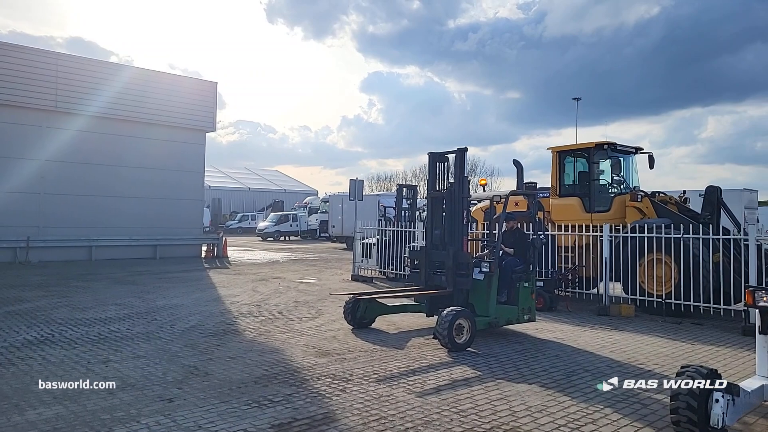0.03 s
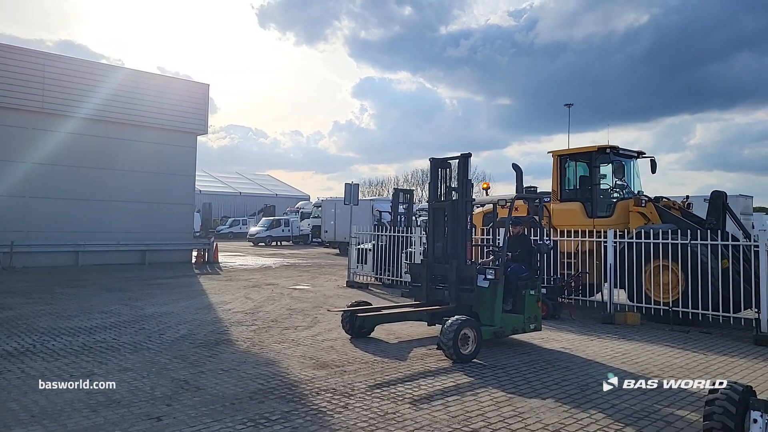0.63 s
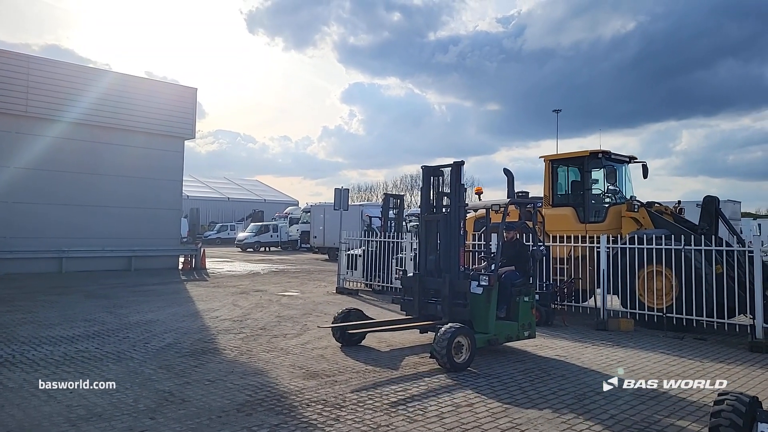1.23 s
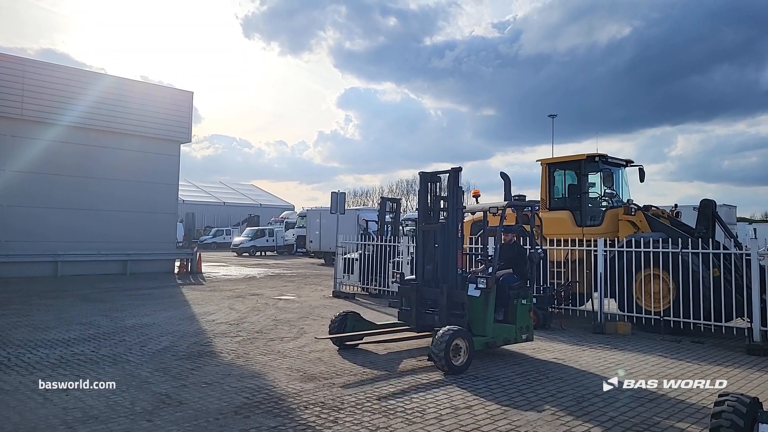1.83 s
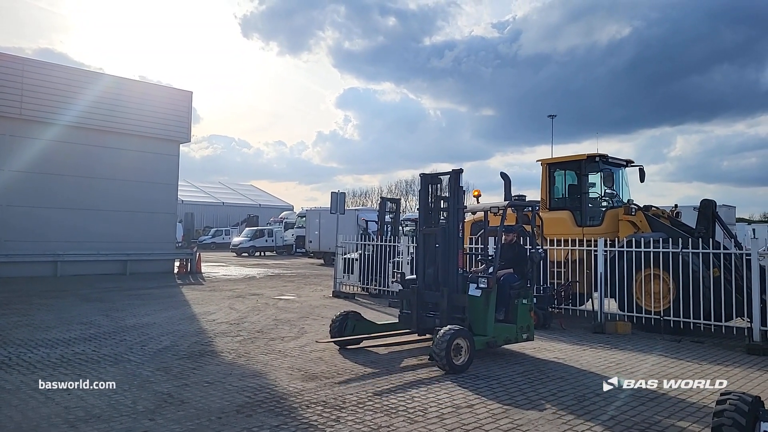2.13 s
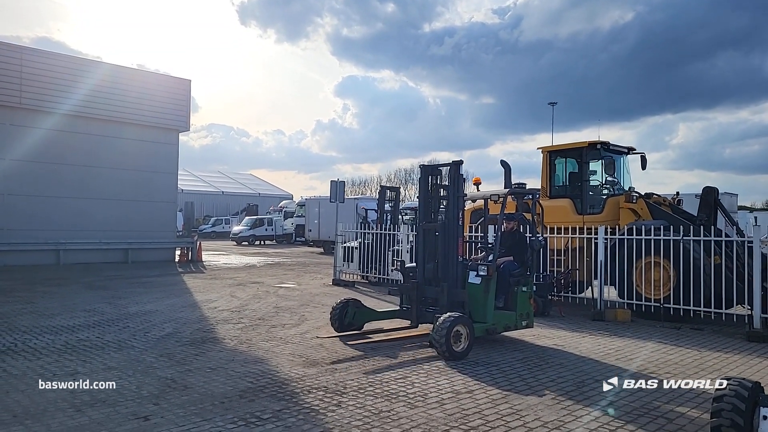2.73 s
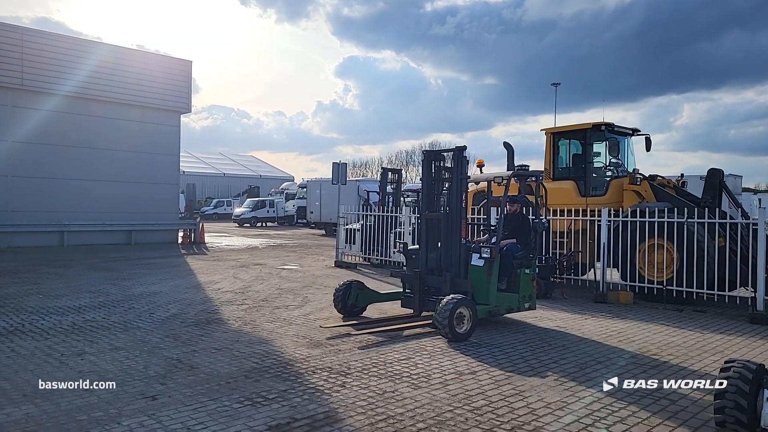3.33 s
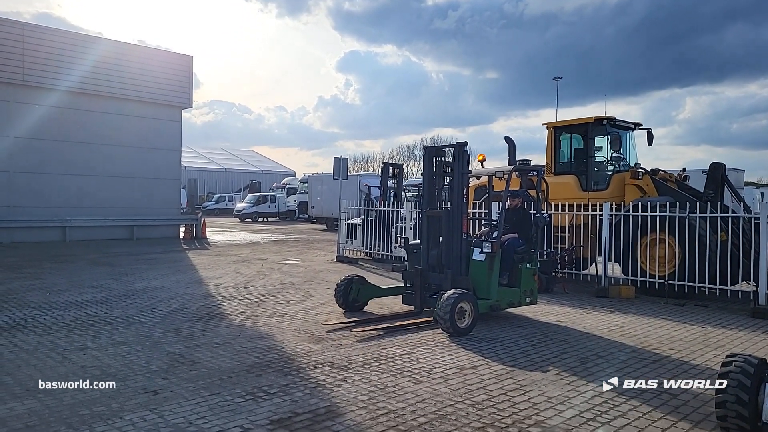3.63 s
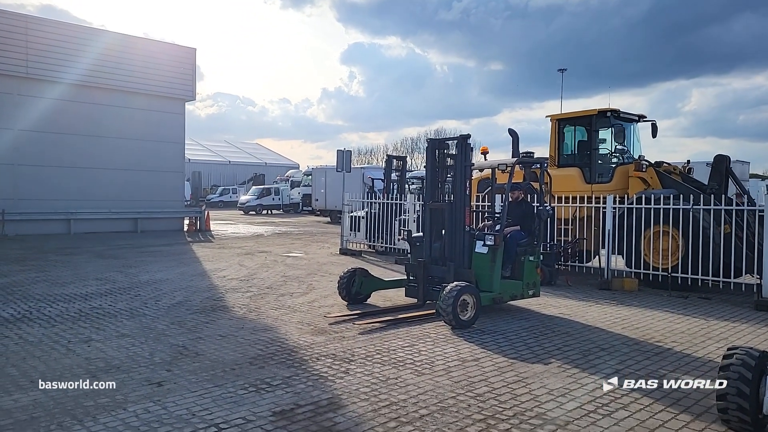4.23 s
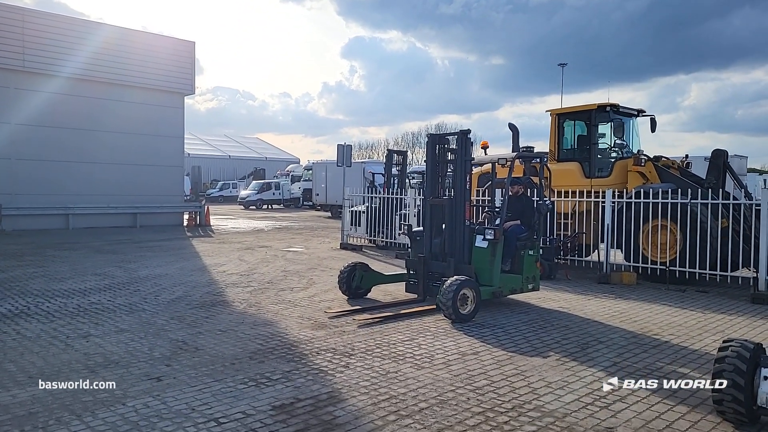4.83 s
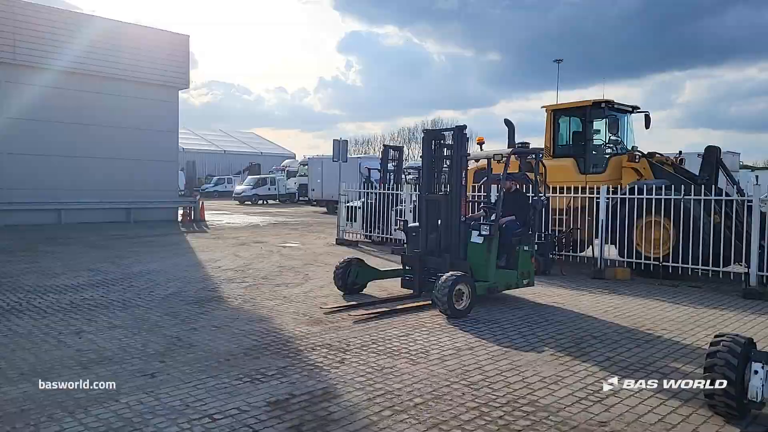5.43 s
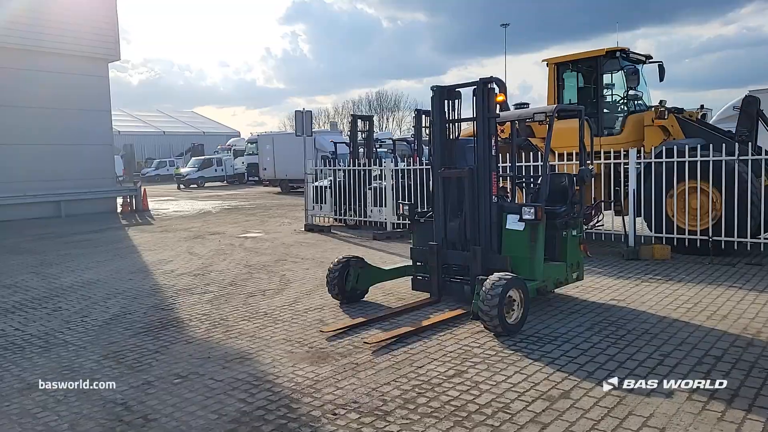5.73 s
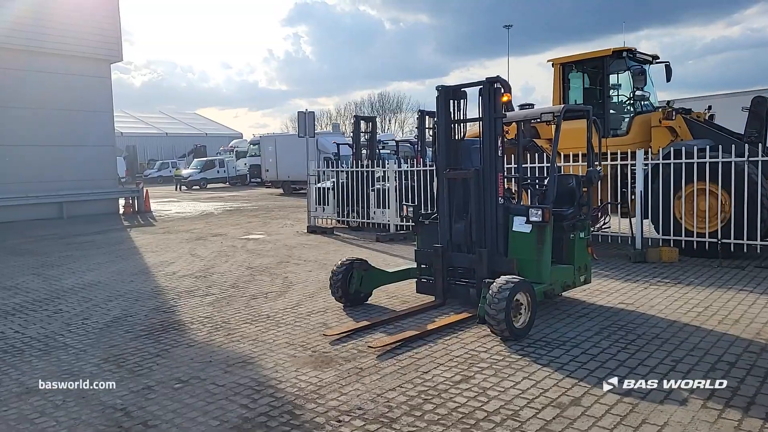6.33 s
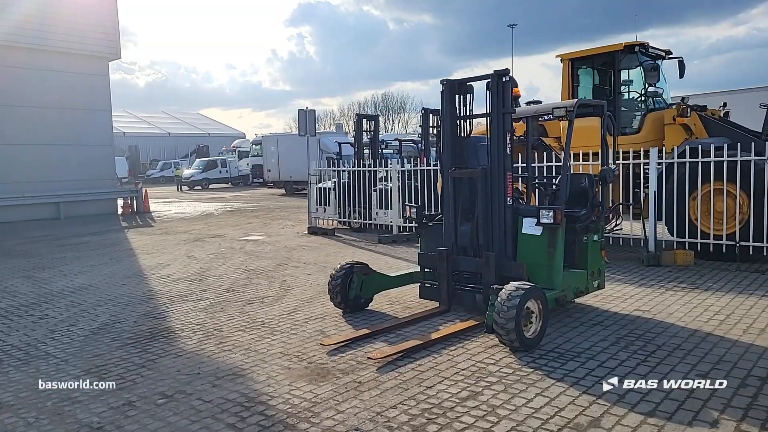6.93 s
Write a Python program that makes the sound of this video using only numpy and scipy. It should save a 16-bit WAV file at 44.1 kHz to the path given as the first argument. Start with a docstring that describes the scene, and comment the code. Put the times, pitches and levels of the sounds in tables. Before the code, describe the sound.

A diesel forklift drones under hydraulic load, eases off, clangs its forks on paving, then idles closer beside another ticking diesel.

```python
"""First comes the hard drone of a three-cylinder diesel forklift, its hydraulic pump loading the engine.
Each firing thumps in the exhaust and knocks the engine block, while oil hisses through a valve.
The pump lets go, then loads the engine again as the forks clang down on the paved yard.
After a tiny silence the forklift is closer and idles slowly. A second diesel throbs and ticks
nearby in both stretches, over a low rumble."""
import sys
import numpy as np
from scipy import signal
from scipy.fft import rfft, irfft, next_fast_len
from scipy.io import wavfile
from scipy.ndimage import uniform_filter1d

SR = 44100
rng = np.random.default_rng(int(sys.argv[2]) if len(sys.argv) > 2 else 0)


def bounce(signal):
    """Save signal as a 16-bit WAV file at the path given by the first command-line argument."""
    frames = np.transpose(np.atleast_2d(signal))
    limited = np.clip(frames, -1, 1)
    pcm = np.round(limited * 32767).astype(np.int16)
    wavfile.write(sys.argv[1], SR, pcm)


N = 317079
T = np.arange(N) / SR
HZ = np.fft.rfftfreq(N, 1 / SR)
SILENCE_FROM_S, SILENCE_TO_S = 5.402, 5.449


# How hard each of the three cylinders fires: (level [dB])
CYLINDER_DB = [0, -3, -0.74]
# Tone of the knocking engine block: (pitch [Hz], level [dB])
BLOCK_TONE = [(50, -20), (90, -3), (180, -4), (255, 3), (340, -11), (450, -7), (520, -11), (620, -7),
              (720, -16), (1100, -19), (2500, -32)]
def forklift_working(free_firing_hz=61.595, slowdown_hz=3.033):
    """The pump slows the engine and makes it work harder; each stroke also jolts the body."""
    effort, age = pump(), stroke_age()
    flow = lagged(effort, lag_s=0.09, first=1)
    load = np.clip(0.087 + flow, 0, 1)  # a little load stays with the valve shut
    shake = amp(0.82 + 3 * surge(age, peak_s=0.16))
    firings = np.cumsum(free_firing_hz - slowdown_hz * effort) / SR  # counts up by one per firing
    firings = firings - np.interp(.4773, T, firings)  # the first cylinder fires at .4773 s
    firings += 0.0011 * wander(hz=40.2)
    note = working_exhaust(firings, load)
    puffs = shake * gas_puffs(firings, load, age)
    rattle = np.sqrt(shake) * clatter(firings) + panel_buzz()
    oil = oil_hiss(age)
    knock = shake ** 2 * amp(-39) * block_knock(firings, BLOCK_TONE, scatter_db=1.6)
    return note + puffs + rattle + knock + flow * (hollow_boom(note, firings, age) + oil)


# Spells of pumping: (valve opens [s], valve shuts [s], effort [1 = full load])
PUMP_STROKES = [(0.0, 3.605, 1.0), (4.621, 4.749, 1.258)]
def pump(open_s=.104, shut_s=.122, ease_per_s=.017):
    """The pump's effort rises as the valve opens, eases a little, and falls as it shuts."""
    total = np.zeros(N)
    for start, end, effort in PUMP_STROKES:
        opening = np.clip((T - start) / open_s, 0, 1)
        shutting = np.clip(1 - (T - end) / shut_s, 0, 1)
        total += effort * opening * shutting * (1 - ease_per_s * (T - start))
    return total


def stroke_age():
    """Seconds since the latest pump stroke began."""
    starts = np.array(PUMP_STROKES)[:, 0]
    return T - starts[np.searchsorted(starts, T, side="right") - 1]


# Exhaust notes, working hard and running free: (pitch [times the firing rate], level [dB])
LOADED_NOTES = [(1, -2.8), (2, 0.0), (3, -3.8), (4, -11.9), (5, -25.8), (6, -19.2), (7, -20.4), (8, -14.0),
                (9, -23.7), (10, -21.8), (11, -22.0), (12, -42.1), (13, -46.1), (14, -39.5), (15, -46.4),
                (16, -32.6), (17, -43.8), (18, -37.9), (19, -39.0), (20, -40.8)]
FREE_NOTES = [(1, -9), (2, 2), (3, -4.5), (4, -27.5), (5, -33), (6, -34.5), (7, -25), (8, -30), (9, -39),
              (10, -26.5)]
# Extra notes from unequal cylinders, likewise: (pitch [times the cycle rate], level [dB])
LOADED_UNEVEN = [(4, 0), (5, 4.5), (7, -5), (14, 11), (16, -1), (20, -5.5), (22, -25), (23, 1), (25, -12.5),
                 (31, -0.8)]
FREE_UNEVEN = [(5, -1), (14, 0), (22, 4)]
# Rise and fall of both engines' low throb: (time [s], level [dB])
THROB_LEVEL = [(0, -1.5), (1.5, 0), (5.4, 0), (5.45, -6), (5.76, -.5), (7.19, 0)]
def working_exhaust(firings, load):
    """The drone blends from a smooth hum to a harder note as the load grows."""
    loaded = amp(-12.9) * exhaust(firings, LOADED_NOTES, hardness=load)
    loaded += amp(-31.5) * uneven_cylinders(firings, LOADED_UNEVEN)
    free = amp(-16.5) * exhaust(firings, FREE_NOTES)
    free += amp(-38.5) * uneven_cylinders(firings, FREE_UNEVEN)
    return (load * loaded + (1 - load) * free) * amp(curve(THROB_LEVEL) + .5 * wander(hz=49.43))


def exhaust(firings, notes, hardness=0.93, size=256):
    """Each firing sends a pulse ringing through the silencer; a softer pulse has weaker high notes."""
    multiple, db = np.transpose(notes)
    grid = np.arange(size) / 4  # four steps from one note to the next
    shape_db = np.interp(grid[:size // 2 + 1], np.r_[0, multiple, multiple[-1] + 4],
                         np.r_[db[0] - 12, db, db[-1] - 10])
    mirrored = amp(np.r_[shape_db, shape_db[-2:0:-1]])
    phase = -signal.hilbert(np.log(mirrored)).imag  # the ringing comes after the pulse
    phase += rng.uniform(-2, 2, size) * (grid > 5)  # echoes scatter the high notes in time
    phase -= .08 * (grid - 2) ** 2  # the silencer holds higher notes back longer
    softening = hardness ** 0.1
    wave = sum(amp(level) * softening ** (k - 1) * np.cos(2 * np.pi * k * firings + phase[4 * k])
               for k, level in zip(np.rint(multiple).astype(int), db))
    return -np.sqrt(2) * wave / np.linalg.norm(amp(db))


def uneven_cylinders(firings, notes):
    """Unequal cylinders repeat every three firings (one cycle), adding notes between the main ones."""
    cycles = firings / len(CYLINDER_DB)
    return unit(sum(amp(db + 4.3 * wander(hz=6)) * np.cos(2 * np.pi * (round(k) * cycles + rng.random()))
                    for k, db in notes))


def block_knock(firings, tone, scatter_db=2.0, ring_s=0.11):
    """Each firing knocks the engine block and its panels, never twice equally hard."""
    hits = np.flatnonzero(np.diff(np.floor(firings)) > 0)
    cylinder = np.floor(firings[hits + 1]).astype(int) % len(CYLINDER_DB)
    blows = np.zeros(N)
    blows[hits] = amp(np.array(CYLINDER_DB)[cylinder] + scatter_db * rng.standard_normal(len(hits)))
    ring = noise(tone, size=8192) * amp(-60 * T[:8192] / ring_s)
    return unit(signal.oaconvolve(blows[None], ring, axes=1)[:, :N])


# Tone of the boom, with two hollow peaks: (pitch [Hz], level [dB])
BOOM_TONE = [(150, -36), (205, 0), (238, 4.5), (275, -25), (330, -25), (520, -27), (590, -2), (650, -0.5),
             (720, -13), (820, -32)]
def hollow_boom(note, firings, age, rise_s=.25, fade_db_per_s=11.5, roughness=0.44):
    """The exhaust note and its puffs set off a hollow ringing early in each stroke."""
    hum = unit(irfft(rfft(note) * amp(read(BOOM_TONE, HZ)), N))
    puffs = unit(noise(BOOM_TONE) * bursts(firings, CYLINDER_DB, length=1.2))
    swell = amp(-21 - fade_db_per_s * age) * (1 - np.exp(-age / rise_s))
    return swell * unit((1 - roughness) * hum + roughness * puffs)


# Tone of the puffing gas: (pitch [Hz], level [dB])
PUFF_TONE = [(150, -28), (280, -4), (450, -5.5), (630, 8), (760, -16), (1200, -20), (3000, -26)]
def gas_puffs(firings, load, age):
    """Each firing puffs out gas, louder under load and fading as the stroke goes on."""
    level = amp(-35 - 0.8 * age * load) * (.5 + .5 * load)
    return level * noise(PUFF_TONE, ripple_db=3.5) * bursts(firings, CYLINDER_DB, length=1.0)


# Tone of the working engine's clatter: (pitch [Hz], level [dB])
CLATTER_TONE = [(200, -30), (400, 1), (750, 3.5), (1080, 2), (1500, -3.5), (2000, -3), (2600, -6.5),
                (3300, -10.5), (6200, -13.5), (7900, -11), (8900, -22), (11700, -26.5), (13300, -28),
                (17000, -19)]
def clatter(firings):
    """A bright rattle that pulses gently with the firings."""
    pulsing = unit(1 + 0.19 * bursts(firings, CYLINDER_DB, length=0.83))
    return amp(-36.5) * noise(CLATTER_TONE, ripple_db=2.5) * pulsing * amp(0.36 * wander(hz=24.9))


# Tone of a buzzing panel: (pitch [Hz], level [dB])
PANEL_TONE = [(2200, -26), (2480, 1), (2570, 0), (2700, -8.5), (2950, -8)]
def panel_buzz():
    """A panel gives a faint, flickering buzz."""
    return amp(-54) * noise(PANEL_TONE) * amp(3.3 * wander(hz=25.04))


# Tone of the rushing oil: (pitch [Hz], level [dB])
OIL_TONE = [(1500, -10), (3300, 4), (5300, 6.5), (6500, -6), (7700, 13), (8800, -2), (11700, -18),
            (13300, 5), (16000, -28)]
def oil_hiss(age):
    """Oil rushes through the valve, loudest as a stroke gets going."""
    return amp(-51.5 + 6 * surge(age, peak_s=0.49)) * noise(OIL_TONE)


# Exhaust notes at idle: (pitch [times the firing rate], level [dB])
IDLE_NOTES = [(1, -35.5), (2, -3.5), (3, 1.5), (4, -6), (5, -8), (6, -11), (7, -16.5), (8, -11), (9, -22),
              (10, -29.5)]
# Tones of the clatter and the block from close by: (pitch [Hz], level [dB])
CLOSE_CLATTER_TONE = [(200, -32), (400, -6.5), (720, 8.5), (950, 1), (1450, -4.5), (1950, -2.5), (2650, -6),
                      (3200, -9.5), (4500, -8.5), (6200, -13.5), (7900, -10.5), (8900, -23), (11700, -24.5),
                      (17000, -20)]
CLOSE_BLOCK_TONE = [(50, -20), (90, -3), (180, -6), (270, 4), (340, -9), (460, -15), (620, -5),
                    (720, -18.5), (1100, -20), (2500, -32)]
def forklift_idling(firing_hz=32.15, settle_db=3.0, settle_s=0.33):
    """Slow, soft firings let the clatter stand out; the body shakes more at first, then settles."""
    firings = (T - 5.5915) * firing_hz + 0.0048 * wander(hz=20)
    shake = amp(settle_db * np.exp(-np.maximum(T - SILENCE_TO_S, 0) / settle_s))
    note = amp(-21.5 + curve(THROB_LEVEL) + 1.9 * wander(hz=29.8)) * exhaust(firings, IDLE_NOTES)
    pulsing = unit(1 + 0.086 * bursts(firings, CYLINDER_DB, length=1.0))
    rattle = amp(-37.5) * noise(CLOSE_CLATTER_TONE, ripple_db=2.0) * pulsing
    knock = amp(-36.5) * block_knock(firings, CLOSE_BLOCK_TONE)
    return note + shake * (knock + rattle)


# Blows on the forks and mast: (time [s], level [dB], ring length [1 = full])
FORK_HITS = [(.29, -29, .7), (.338, -32, .7), (4.737, -18, 0.89), (4.744, -15.5, 0.75),
             (4.757, -21.5, 0.84), (4.8, -27.5, 1), (4.864, -30, .9)]
# Ringing notes of the steel forks: (pitch [Hz], level [dB], time to fade by 60 dB [s])
STEEL_NOTES = [(457, -6, 0.41), (586, 2, 0.19), (660, -9, 0.2), (990, 1, 0.12), (1116, -8, 0.25),
               (1340, -4, 0.19), (1503, -8, .28), (1962, -6, 0.13), (2360, -19, .2), (2530, -7.5, 0.27),
               (2960, -30, .18), (3440, -13, 0.19)]
# Tone of the crashing chain and mast: (pitch [Hz], level [dB])
CRASH_TONE = [(120, -15), (300, 6.5), (620, 7), (800, -4), (1250, -1), (1700, -8), (2700, -10),
              (3700, -14.5), (6000, -24), (12000, -43)]
def forks(crash_s=0.093, ring_db=-5.5, rise_s=0.0035):
    """The forks land and rattle: a short crash of chain and mast, and ringing steel."""
    out, t = np.zeros((2, N)), T[:SR]
    for start, db, length in FORK_HITS:
        phases = rng.uniform(0, 2 * np.pi, (len(STEEL_NOTES), 2, 1))
        ring = sum(amp(level - 60 * t / (fade_s * length)) * np.sin(2 * np.pi * hz * t + phase)
                   for (hz, level, fade_s), phase in zip(STEEL_NOTES, phases))
        crash = noise(CRASH_TONE, size=SR) * amp(-60 * t / (crash_s * length))
        add(out, start, amp(db) * (crash + amp(ring_db) * ring) * (1 - np.exp(-t / rise_s)))
    return out


# Second diesel's exhaust before and after the silence: (pitch [times the firing rate], level [dB])
SECOND_NOTES_BEFORE = [(1, -17), (2, -9.5), (3, 0.5), (4, -0.5)]
SECOND_NOTES_AFTER = [(1, -14.5), (2, 0.5), (3, 1.5), (4, 0), (5, -12.5), (6, -23), (7, -22), (8, -13.5)]
# Tones of its knock and its ticks: (pitch [Hz], level [dB])
KNOCK_TONE = [(1000, -23), (1600, -17), (1900, 7), (2250, -14), (2620, 3), (3200, -13), (4500, -18),
              (7000, -11)]
TICK_TONE = [(1000, -14), (2000, 15), (4000, 0.5), (7800, 9.5), (9000, -1.5), (11700, -6), (13300, 0.5),
             (16000, -2)]
# How loudly each of its fuel injectors ticks: (level [dB])
INJECTOR_DB = [0, -1.0, -8.0]
def second_diesel(notes, firing_hz, fires_at_s, note_db, tick_db, knock_db):
    """Another engine idles: its exhaust throbs, its firings knock, its injectors tick with a limp."""
    firings = (T - fires_at_s) * firing_hz
    note = amp(note_db + curve(THROB_LEVEL)) * exhaust(firings + 0.011 * wander(hz=20), notes)
    knock = noise(KNOCK_TONE) * bursts(firings - .1, [0, -2.5, -1.5], length=0.32)
    knock *= amp(knock_db + 1.4 * wander(hz=36.6))
    ticks = noise(TICK_TONE) * bursts(firings - .5, INJECTOR_DB, length=.2, rise=.1)
    ticks *= amp(tick_db + wander(hz=35))
    return note + knock + ticks


# Light metal clicks: (time [s], level [dB])
CLICK_HITS = [(.968, -42), (4.324, -47), (6.56, -35), (6.57, -40), (6.682, -45)]
# Tone of a click: (pitch [Hz], level [dB])
CLICK_TONE = [(800, -14), (1800, 3), (3600, -4), (4400, 13), (5400, -5), (7300, 6), (9000, -3), (12000, -8),
              (16000, -8)]
def clicks(fade_s=0.11):
    """Small, dry metal clicks that die away at once."""
    out, t = np.zeros((2, N)), T[:SR // 10]
    for start, db in CLICK_HITS:
        add(out, start, amp(db - 60 * t / fade_s) * noise(CLICK_TONE, size=len(t)))
    return out


# Tones of the steady rumble and its swells: (pitch [Hz], level [dB])
RUMBLE_TONE = [(15, -30), (28, -43), (45, 1), (110, -7), (170, -8), (265, -4), (320, -14), (600, -17.5),
               (900, -41)]
SWELL_TONE = [(20, -14), (45, -1), (62, 6), (100, -1), (180, -11), (350, -20.5), (900, -29)]
# Swells of rumble: (time [s], peak level [dB], half length [s])
SWELLS = [(7.022, -15, .05), (7.18, -23, .04)]
def yard_rumble():
    """A steady low rumble, with two brief swells near the end."""
    swells = sum(amp(db) * np.exp(-((T - peak_s) / half_s) ** 2) for peak_s, db, half_s in SWELLS)
    return amp(-29) * noise(RUMBLE_TONE) + swells * noise(SWELL_TONE)


# How alike left and right sound: (pitch [Hz], likeness [0-1])
SIDE_LIKENESS = [(60, .99), (150, .98), (300, .92), (650, .8), (1400, .35), (3000, .35), (6500, .35),
                 (8000, .78), (15000, .84)]
# How far the left side runs ahead: (pitch [Hz], lead [radians])
LEFT_LEAD = [(0, 0), (600, -.2), (1150, -1.5), (1450, -3.2), (2150, -6.2), (2600, -6.8), (4200, -11.6),
             (5200, -15.5), (6100, -16), (7000, -12.6), (16000, -12.6)]
def noise(tone, size=N, ripple_db=0.):
    """Stereo noise of a given tone: alike on both sides in the bass, scattered by the yard higher up."""
    count = next_fast_len(size, True)
    hz = np.fft.rfftfreq(count, 1 / SR)
    shared, separate = rfft(rng.standard_normal((2, count)))
    like, lead = np.clip(read(SIDE_LIKENESS, hz), 0, 1), read(LEFT_LEAD, hz)
    right = (like * shared + np.sqrt(1 - like ** 2) * separate) * np.exp(-1j * lead)
    db = read(tone, hz) - 20 * np.log2(np.maximum(hz / tone[-1][0], 1))  # fades above the last row
    db += ripple_db * read(np.c_[np.geomspace(300, 16000, 300), rng.standard_normal(300)], hz)
    middle_gain = np.sqrt(1 + like * np.cos(lead) + 1e-3)
    sides = irfft(np.array([shared, right]) * amp(db) / middle_gain, count)[:, :size]
    return sides / np.std(sides.mean(0))


def bursts(firings, cylinder_db, length, rise=0.089):
    """A level that jumps at each firing, then fades; length and rise are counted in firings."""
    age = firings % 1
    cylinder = np.floor(firings).astype(int) % len(cylinder_db)
    return unit(amp(cylinder_db)[cylinder] * (1 - np.exp(-age / rise)) * np.exp(-age / length))


def surge(age, peak_s):
    """Rises to 1 at peak_s and dies away."""
    return age / peak_s * np.exp(1 - age / peak_s)


def lagged(x, lag_s, first):
    """Follows x sluggishly, starting from the value first."""
    keep = np.exp(-1 / (lag_s * SR))
    return first + signal.lfilter([1 - keep], [1, -keep], x - first)


def wander(hz):
    """A random drift that heads for a new value hz times a second."""
    count = int(8 * hz) + 2
    return unit(np.interp(T * hz, np.arange(count), rng.standard_normal(count)))


def amp(db):
    """Turns decibels into a gain."""
    return 10 ** (np.asarray(db) / 20)


def unit(x):
    """Scales to an average strength (rms) of 1."""
    return x / np.sqrt(np.mean(x ** 2) + 1e-20)


def curve(rows):
    """Joins (time, value) rows with straight lines."""
    return np.interp(T, *np.transpose(rows))


def read(rows, hz):
    """Looks up hz between (pitch, value) rows, with octaves evenly spaced."""
    pitch, value = np.transpose(rows)
    return np.interp(np.log(hz + 1), np.log(pitch + 1), value)


def add(mix, start_s, sound):
    """Mixes in a stereo sound at start_s."""
    part = mix[:, round(start_s * SR):][:, :sound.shape[1]]
    part += sound[:, :part.shape[1]]


def scene():
    """Two stretches in the same yard, with a moment of silence between them."""
    far = forklift_working() + second_diesel(
        SECOND_NOTES_BEFORE, firing_hz=34.07, fires_at_s=3.7523,
        note_db=-24.5, tick_db=-51.5, knock_db=-52.5)
    near = forklift_idling() + second_diesel(
        SECOND_NOTES_AFTER, firing_hz=34.11, fires_at_s=5.5816,
        note_db=-19.5, tick_db=-49.5, knock_db=-45.5)
    yard = yard_rumble() + forks() + clicks()
    before, after = uniform_filter1d(np.array([T < SILENCE_FROM_S, T > SILENCE_TO_S], float), size=100)
    return before * (far + yard) + after * (near + yard)


# How much louder the left side is: (pitch [Hz], left minus right [dB])
LEFT_BOOST = [(30, 2.5), (60, 1.9), (125, 1.4), (250, .7), (500, 1.7), (1000, 0), (2000, -1.8),
              (4000, -3.4), (8000, -2.7), (12000, -3.6)]
# How far the left side falls behind: (pitch [Hz], lag [radians])
LEFT_LAG = [(30, 1), (60, 0.22), (125, 0.2), (250, 0.22), (500, 0.46), (900, 0.18)]
def record(dry, top_hz=15900):
    """Each side gets its own tone, low notes reach the left later, and the highest treble is cut."""
    difference = np.log(amp(read(LEFT_BOOST, HZ))) - 1j * read(LEFT_LAG, HZ)
    coloured = irfft(rfft(dry) * np.exp(np.array([[.5], [-.5]]) * difference), N)
    treble_cut = signal.firwin(511, top_hz, window=("kaiser", 9), fs=SR)
    return signal.oaconvolve(coloured, treble_cut[None], "same")


dry = scene()
out = record(dry)
bounce(out)
```